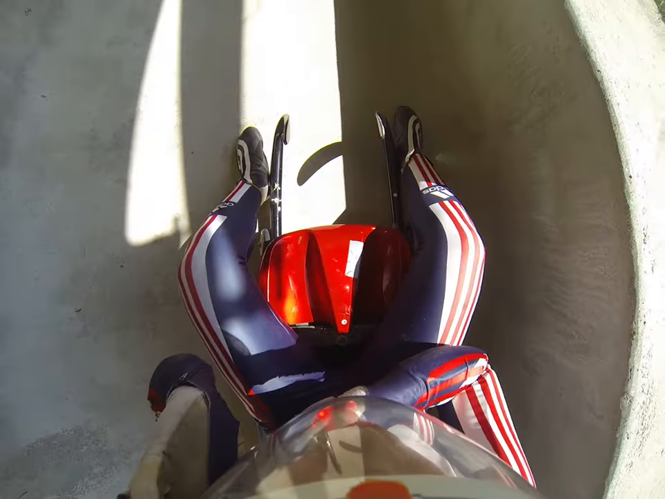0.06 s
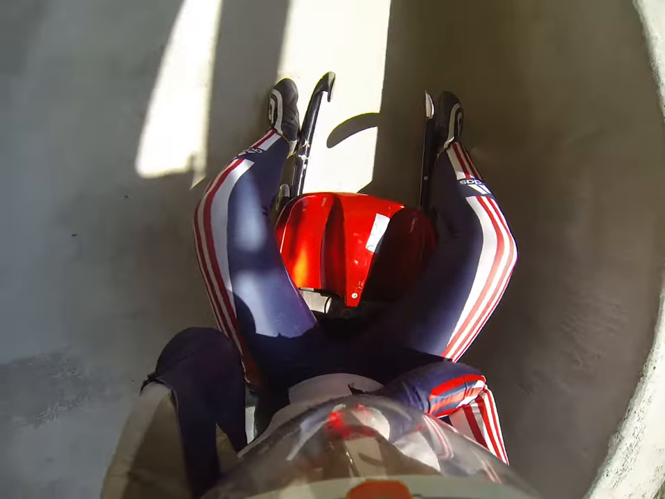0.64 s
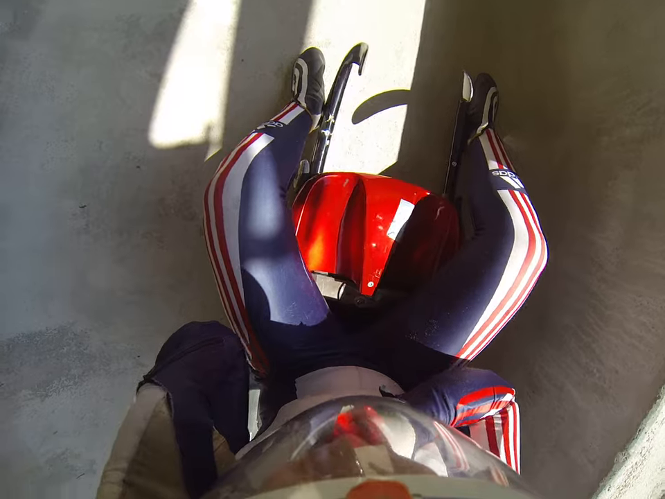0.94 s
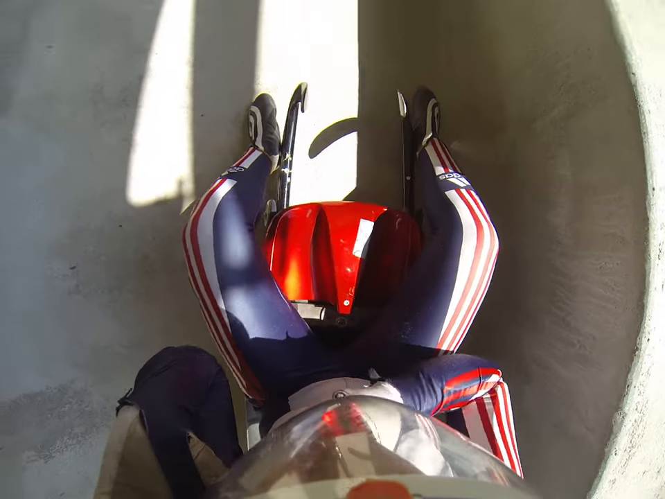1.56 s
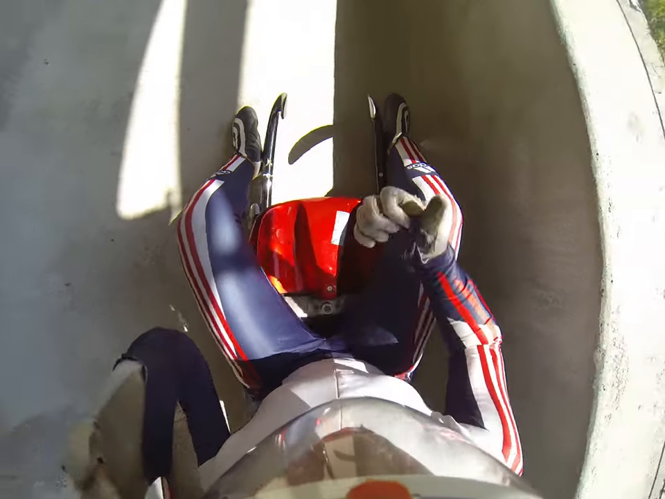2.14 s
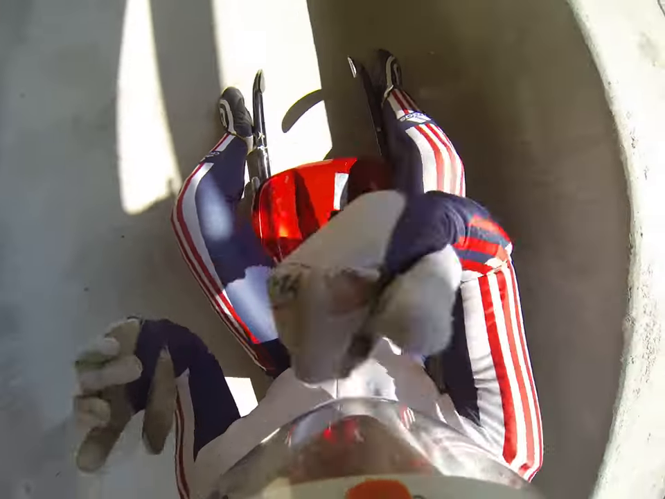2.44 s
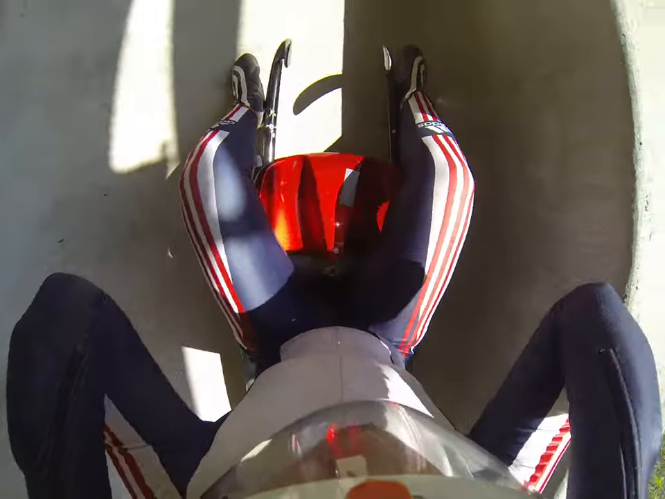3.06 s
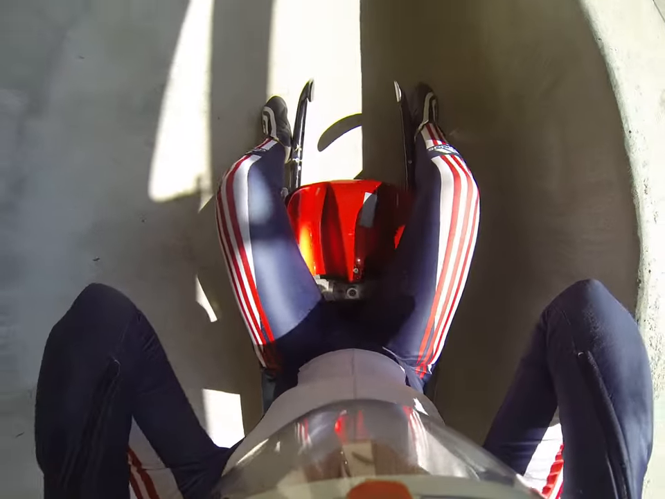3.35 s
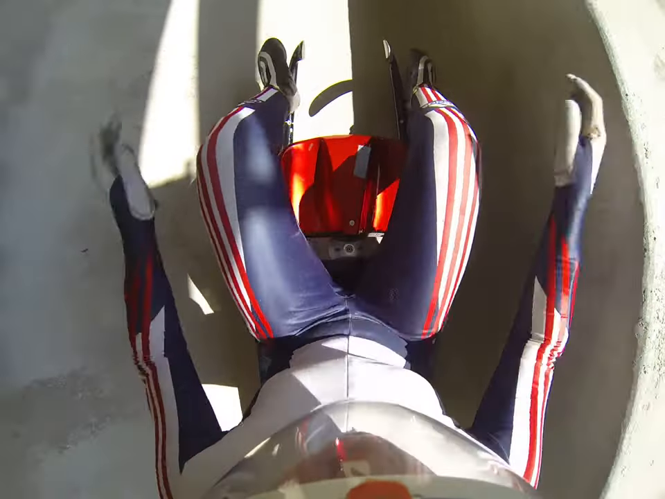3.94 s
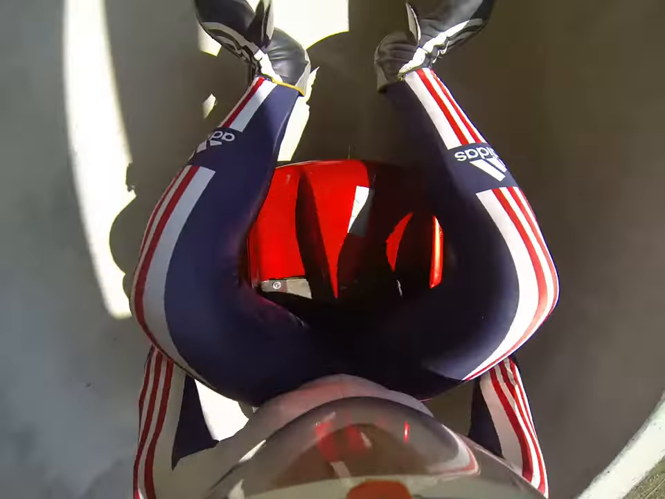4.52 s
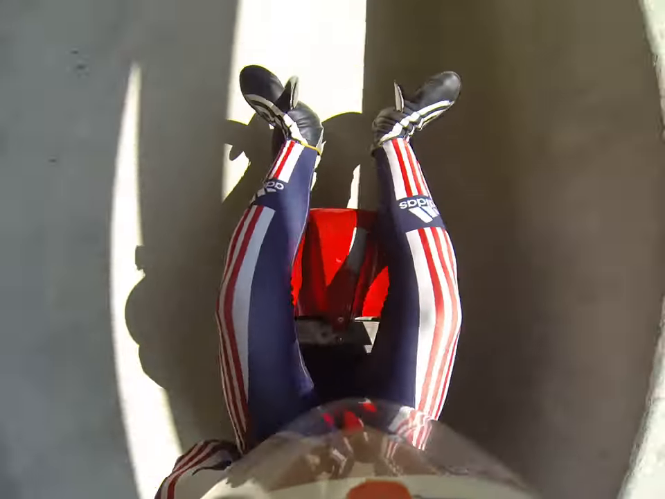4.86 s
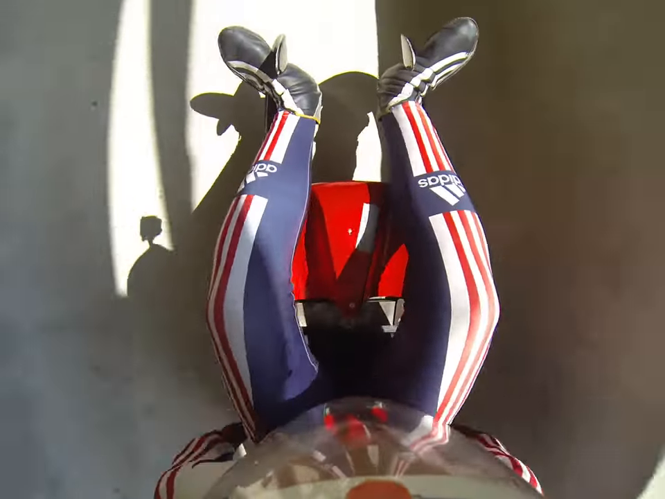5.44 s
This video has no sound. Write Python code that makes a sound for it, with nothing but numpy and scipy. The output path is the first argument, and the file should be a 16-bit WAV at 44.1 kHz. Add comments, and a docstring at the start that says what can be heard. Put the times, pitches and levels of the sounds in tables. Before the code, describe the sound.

A single sharp hand clap, close enough to overload the helmet microphone, stands out about halfway through a luge start in a concrete chute. Low gusts of wind come and go throughout, over quiet runner scraping, cloth rubbing and boxy knocks. Heavy, dull thumps land shortly before and after the clap. Toward the end come small squeaks and ticks as the rider lies back and the wind picks up.

```python
"""A concrete start chute, heard close up from a microphone in a closed camera housing on a luge rider's helmet.
The sled rocks to and fro: runners rumble and scrape and the suit rubs, among knocks, rattles and ticks.
Wind buffets the housing and blows its hollow like a bottle, over a faint hiss and whine.
The rider claps once, hard enough to overload the microphone and duck its gain,
then pushes off and lies back, shoes and suit squeaking on the sled."""
import sys
import numpy as np
from scipy import signal
from scipy.fft import rfft, irfft, next_fast_len
from scipy.io import wavfile
from scipy.ndimage import uniform_filter1d, minimum_filter1d, map_coordinates

SR = 44100
rng = np.random.default_rng(int(sys.argv[2]) if len(sys.argv) > 2 else 0)


def pcm_store(signal):
    """Save signal as 16-bit PCM."""
    levels = np.round(np.clip(np.atleast_2d(signal), -1, 1) * 32767)
    wavfile.write(sys.argv[1], SR, levels.astype(np.int16).T)


N = 250929
TIME = np.arange(N) / SR
AGE = np.arange(SR // 3) / SR  # seconds since a short sound began

# jolts of the helmet, each with a puff of air: t/s, sway/dB, relative puff/dB
JOLTS = [(0.126, -13, -37), (1.35, -37, -17), (1.997, -4, -12.5), (2.47, -3, -26), (3.139, 1.5, -10.5),
         (5.188, -25, -9), (5.352, -15, -5)]
# the sled's rumble as it rocks, then sets off: t/s, level/dB
RUMBLE_LEVEL = [(0, -56), (.4, -52.5), (.78, -53.5), (1.12, -62.5), (1.5, -55), (1.8, -57), (2.35, -62.5),
                (2.95, -62), (3.28, -58), (3.6, -59.5), (4.15, -60.5), (4.47, -52), (4.65, -55),
                (5.69, -53)]
# resonances of the air inside the housing: f/Hz, width/Hz, gain/dB
HOLLOW_MODES = [(262, 150, -6.5), (387, 114.4, 1), (491.4, 142, -4.5), (737, 317, -15)]
# resonances of the housing's stiff shell: f/Hz, width/Hz, gain/dB
SHELL_MODES = [(1242, 330, 4), (1610, 376, 4), (2561, 150, -6.5), (2921, 670, -15.5), (3802, 1500, -26.5),
               (5800, 760, -23)]
# bright spectrum of rubbing cloth, also used for the hiss: f/Hz, gain/dB
CLOTH_SPECTRUM = [(900, -40), (2000, -3), (3200, 0.5), (4300, -3), (5600, -4), (6500, -7), (7700, -5.5),
                  (9000, -6), (12500, -4), (15500, -19)]
# spectrum of a low, heavy thud: f/Hz, gain/dB
THUD_SPECTRUM = [(30, -22), (70, -3), (120, 4), (220, -10.5), (330, -15), (900, -61.5), (3000, -110)]
# treble lost by a padded contact: f/Hz, gain/dB
PADDING = [(1800, -1.5), (2700, -3.5), (3500, -5.5), (6000, -11), (14000, -27.5)]


def amp(db):
    """Decibels to gain."""
    return 10 ** (np.asarray(db) / 20)


def unit(x):
    """Scale to rms 1."""
    return x / np.sqrt(np.mean(x ** 2) + 1e-20)


def crest(x):
    """Scale so that the loudest 5 ms have rms 1."""
    return x / np.sqrt(uniform_filter1d(x ** 2, size=220).max() + 1e-20)


def curve(points):
    """Join (t/s, value) points into one value per sample."""
    return np.interp(TIME, *np.transpose(points))


def wobble(rate):
    """A smooth random curve, rate knots a second."""
    return map_coordinates(rng.standard_normal(int(N * rate / SR) + 4), [TIME * rate])


def decay(t60):
    """An envelope that falls 60 dB in t60 seconds."""
    return np.exp(-np.log(1000) * AGE / t60)


def pulse(peak_s):
    """An envelope that rises to 1 at peak_s and dies away."""
    return AGE / peak_s * np.exp(1 - AGE / peak_s)


def swell(t, width_s):
    """A bell-shaped rise and fall around time t."""
    return np.exp(-.5 * ((TIME - t) / width_s) ** 2)


def stroke(t, width_s, bite=.12, release=0.3):
    """Envelope of a rub, three widths long around time t: it bites quickly and lets go more slowly."""
    u = (TIME - t) / width_s
    return (1 + np.tanh((u + 1.5) / (2 * bite))) * (1 - np.tanh((u - 1.5) / (2 * release))) / 4


def add(track, t, sound):
    """Mix a sound into the track at time t."""
    part = track[round(t * SR):][:len(sound)]
    part += sound[:len(part)]


def colour(x, points):
    """Minimum-phase filter through (f/Hz, gain/dB) points."""
    size = 2 * next_fast_len(len(x) // 2 + 8192)
    hz, db = np.transpose(points)
    log_f = np.log(np.fft.rfftfreq(size, 1 / SR) + 1)
    cepstrum = irfft(np.log(amp(np.interp(log_f, np.log(hz), db))))
    cepstrum[1:size // 2] *= 2
    cepstrum[size // 2 + 1:] = 0
    return irfft(rfft(x, size) * np.exp(rfft(cepstrum)))[:len(x)]


def resonate(x, modes):
    """Drive (f/Hz, width/Hz, gain/dB) resonances of alternating polarity with x."""
    size = 2 * next_fast_len(len(x) // 2 + 8192)
    f = np.fft.rfftfreq(size, 1 / SR)
    response = sum((-1) ** k * amp(db) * 1j * f * width / (hz * hz - f * f + 1j * f * width)
                   for k, (hz, width, db) in enumerate(modes))
    return irfft(rfft(x, size) * response)[:len(x)]


def narrow_noise(hz, width_hz):
    """Noise of rms 1 ringing in one steep resonance."""
    mode = [(hz, width_hz, 0)]
    return unit(resonate(resonate(rng.standard_normal(N), mode), mode))


def grit(spread_db, rate):
    """Friction: noise whose strength jumps with each tiny slip, rate slips a second."""
    slip = (np.arange(N) * rate / SR).astype(int)
    return unit(rng.standard_normal(N) * amp(spread_db * rng.standard_normal(N)[slip]))


def contact(t60, chatter):
    """Force of a contact: one push, then dying chatter."""
    force = rng.standard_normal(len(AGE)) * decay(t60)
    force *= chatter / np.linalg.norm(force)
    force[0] += 1
    return force


def buffeting(spectrum):
    """Slow pressure swings of even strength."""
    eddies = unit(colour(rng.standard_normal(N), spectrum))
    power = uniform_filter1d(np.abs(signal.hilbert(eddies)) ** 2, size=3000) / 2
    return eddies / (np.sqrt(np.abs(power)) + 0.15)


def hiss(level_db=-70.5):
    """A fine steady hiss under everything."""
    return amp(level_db) * unit(colour(grit(spread_db=3, rate=5600), CLOTH_SPECTRUM))


def whine(level_db=-85, flutter_db=3):
    """A faint, thin whine that flutters in the hiss."""
    return amp(level_db + flutter_db * wobble(40)) * narrow_noise(hz=5580, width_hz=160)


def drone(offset_db=-10.5, launch_s=4.21, rise_db_per_s=9, waver_db=2, wander_hz=16):
    """Passing air blows the housing like a bottle, unsteady in pitch and louder as the sled sets off."""
    level = curve(RUMBLE_LEVEL) + offset_db + rise_db_per_s * np.maximum(TIME - launch_s, 0)
    drift = np.exp(2j * np.pi * np.cumsum(wander_hz * wobble(9)) / SR)
    envelope = amp(level + waver_db * wobble(15))
    return envelope * np.real(signal.hilbert(narrow_noise(hz=410, width_hz=63)) * drift)


def wind(shake_db=-2, heave_db=-1, puff_shake_db=-7, puff_heave_db=2):
    """Wind right on the housing: quick shaking rides on deep heaves; a jolt's puff is mostly heave."""
    # air moving past the helmet: t/s, relative level/dB
    air_level = [(0, -34.5), (.38, -32), (.52, -18), (.84, -21.5), (.98, -27.5), (1.25, -26), (1.55, -20),
                 (1.88, -22.5), (2.22, -32), (2.76, -32), (3.02, -30), (3.28, -24.5), (3.9, -29.5),
                 (4.67, -17), (5, -25.5), (5.22, -25), (5.69, -19.5)]
    # the quick shaking: f/Hz, gain/dB
    shake_spectrum = [(22, -27.5), (34, -4.5), (45, -0.5), (53, -6.5), (62, -14.5), (85, -20.5), (130, -33),
                      (200, -51.5), (400, -64), (1000, -120)]
    # the slow heaves: f/Hz, gain/dB
    heave_spectrum = [(6, -27), (16, -4), (27, 2), (33, -4.5), (42, -29), (70, -59.5), (200, -110)]
    # only the slow part of a gust gets through to the microphone: f/Hz, gain/dB
    gust_band = [(50, 0.5), (65, -5), (90, -7.5), (140, -27), (300, -54)]
    air = amp(curve(air_level))
    puffs = sum(amp(db) * swell(t, width_s=0.033) for t, _, db in JOLTS)
    shake = (air + amp(puff_shake_db) * puffs) * amp(shake_db + 3 * wobble(18))
    shake *= buffeting(shake_spectrum)
    heave = (air + amp(puff_heave_db) * puffs) * amp(heave_db + 2 * wobble(35))
    heave *= buffeting(heave_spectrum)
    return colour(shake + heave, gust_band)


def sway(hz=45, t60=0.28, rise_s=0.0026):
    """Each jolt sets the helmet and its mount rocking at a very low pitch."""
    out = np.zeros(N)
    swing = np.sin(2 * np.pi * hz * AGE) * decay(t60) * (1 - np.exp(-AGE / rise_s))
    for t, db, _ in JOLTS:
        add(out, t, amp(db) * swing)
    return out


def runners(scrape_db=-9, scrape_growth=.36):
    """Runners on rough concrete below the rider: rumble and scrape share the same bumps."""
    # the hollow rumble: f/Hz, gain/dB
    rumble_spectrum = [(40, -23.5), (110, 7.5), (220, -1.5), (310, -1.5), (395, -3.5), (500, -8.5),
                       (700, -9.5), (1000, -18), (2000, -29), (6000, -69)]
    # the gritty scrape: f/Hz, gain/dB
    scrape_spectrum = [(300, -32.5), (1050, -16), (1280, 4.5), (1650, -8), (2000, -8.5), (2400, -10.5),
                       (3100, -20), (4200, -24), (6000, -30.5), (15000, -57)]
    level = curve(RUMBLE_LEVEL)
    scrape_level = level.mean() + scrape_growth * (level - level.mean()) + scrape_db
    bumps = wobble(35)
    rumble = unit(colour(grit(spread_db=1.5, rate=190), rumble_spectrum))
    scrape = unit(colour(grit(spread_db=1.5, rate=1600), scrape_spectrum))
    return rumble * amp(level + 2 * bumps) + scrape * amp(scrape_level + 1.6 * bumps)


def ticks(gain_db=-12, peak_s=0.0025):
    """Faint, sharp ticks and clicks close to the microphone, each a few milliseconds of bright noise."""
    # ticks and clicks: t/s, relative level/dB
    clicks = [(0.7734, -44), (1.5974, -46.5), (2.008, -46), (2.024, -45), (2.0517, -47.5), (2.79, -47),
              (2.9041, -44), (3.2214, -45), (3.6078, -46), (4.0393, -49.5), (4.2782, -49), (5.121, -42),
              (5.268, -42.5), (5.2836, -42.5), (5.3183, -42.5), (5.379, -43), (5.3986, -42.5)]
    # one sharp tick: f/Hz, gain/dB
    tick_spectrum = [(600, -28.5), (2000, 3), (3800, -8), (5300, 2.5), (6400, -2), (7500, 2.5),
                     (9000, -13.5), (12200, 0.5), (15500, -22.5)]
    out = np.zeros(N)
    for t, db in clicks:
        burst = pulse(peak_s) * rng.standard_normal(len(AGE))
        add(out, t, amp(db + gain_db) * crest(colour(burst, tick_spectrum)))
    return out


def squeaks(sag_hz_per_s=2400, jitter_hz=65, flutter_db=3, overtone_db_per_octave=-13):
    """Shoes and suit stick and slip on the sled: short, rough chirps that sag in pitch."""
    # catches as the rider lies back: middle t/s, width/s, level/dB, f/Hz
    catches = [(4.231, 0.009, -50, 1310), (4.268, 0.009, -55, 1430), (4.317, 0.008, -51.5, 1295),
               (4.395, 0.012, -49, 1330), (4.432, 0.011, -54, 1320), (4.544, 0.012, -57.5, 1370),
               (4.789, 0.012, -57.5, 1280), (4.884, 0.012, -53, 1310), (4.914, 0.01, -52.5, 1350)]
    out = np.zeros(N)
    jitter = jitter_hz * wobble(500)
    flutter = unit(amp(flutter_db * wobble(220)))
    for t, width_s, db, hz in catches:
        near = np.abs(TIME - t) < 5 * width_s
        pitch = hz - sag_hz_per_s * (TIME[near] - t) + jitter[near]
        phase = 2 * np.pi * np.cumsum(pitch) / SR
        squeak = sum(amp(overtone_db_per_octave * np.log2(k)) * np.sin(k * phase) for k in range(1, 4))
        out[near] += amp(db) * (swell(t, width_s) * flutter)[near] * unit(squeak)
    return out


def scuffs(stutter_db=2, push_db=3):
    """Brief stuttering rubs within arm's reach sound the housing's shell and hollow and push the sled."""
    # gloves, sleeves and legs rubbing past: middle t/s, width/s, rasp/dB, hollow/dB, hiss/dB
    rubs = [(0.311, 0.017, -52.5, -61, -85), (0.383, 0.027, -54.5, -51.5, -85),
            (0.485, .009, -55, -49, -83), (0.707, 0.022, -57.5, -51.5, -82),
            (0.802, 0.021, -54.5, -52, -80), (1.003, 0.013, -55, -65, -80), (1.057, 0.015, -57.5, -65, -80),
            (1.423, 0.043, -59, -58, -77), (1.511, 0.014, -51.5, -55, -74), (1.63, 0.035, -60, -63, -77),
            (1.983, 0.013, -41.5, -34, -80), (2.0, .034, -60, -39, -88), (2.012, .013, -35, -31, -73),
            (3.106, 0.0074, -45.5, -50, -64), (3.69, 0.034, -51.5, -55, -69),
            (3.714, 0.026, -51.5, -60.5, -59.5), (4.237, 0.0094, -60, -51.5, -57.5),
            (4.299, 0.019, -59, -68, -66), (4.393, 0.018, -55.5, -54, -63), (4.467, 0.021, -54, -47, -65),
            (4.54, 0.016, -56.5, -60, -68.5), (4.803, 0.02, -63.5, -56, -72),
            (4.892, 0.033, -54, -55.5, -60), (5.554, 0.016, -64, -56, -64)]
    rasp_tone = [(950, -6), (1250, -0.5), (1550, -5), (2000, 1.5), (2600, -0.5), (3500, -1.5),
                 (5400, -5), (6400, -15), (14000, -39.5)]  # f/Hz, gain/dB
    out = np.zeros(N)
    stutter = unit(amp(stutter_db * wobble(130)))
    shell = resonate(grit(spread_db=3, rate=740), SHELL_MODES)
    rasp = stutter * unit(colour(shell, rasp_tone))
    cavity = resonate(grit(spread_db=3.5, rate=710), HOLLOW_MODES)
    hollow = unit(colour(cavity, [(1200, 0), (4000, -20)]))
    push = amp(push_db) * unit(colour(rng.standard_normal(N), THUD_SPECTRUM))
    cloth = colour(grit(spread_db=2.5, rate=1800), CLOTH_SPECTRUM)
    weave = stutter * unit(colour(cloth, [(7500, 6.5), (10000, -7.5)]))
    for t, width_s, rasp_db, hollow_db, hiss_db in rubs:
        rub = amp(rasp_db) * rasp + amp(hollow_db) * (hollow + push) + amp(hiss_db) * weave
        out += stroke(t, width_s) * rub
    return out


def knocks(crack_gain_db=-7, low_gain_db=1, lag_s=0.0022):
    """Knocks and rattles ring the housing's shell and hollow over a thud; harder ones are brighter."""
    # knocks and short rattles, including one just after the clap; levels are relative:
    # t/s, crack/dB, hollow/dB, thud/dB, rattle t60/s, treble/dB
    contacts = [(0.13, -32, -26.5, -24.5, 0.037, -3), (0.222, -32, -31, -41, .05, -11),
                (0.5055, -34, -25.5, -28, 0.05, -12), (0.5138, -27.5, -38, -43, 0.055, 13),
                (0.845, -26, -41, -49, 0.017, -3), (1.62, -48, -64, -33.5, 0.23, -3),
                (1.861, -45.5, -39, -43, 0.036, -12), (1.926, -49, -45.5, -32.5, 0.052, -4),
                (2.001, -34, -29, -20.5, 0.085, -1), (2.4756, -32, -32.5, -31, 0.088, 14),
                (2.603, -51, -48, -54, .1, 8), (2.852, -66, -57, -42, 0.17, 0),
                (2.975, -61, -48, -35, 0.087, 0), (3.1, -50, -52, -19, 0.085, 2),
                (3.1233, -24, -22, -25, 0.053, 1), (3.1472, -25.5, -36, -22.5, 0.025, -26),
                (3.18, -46, -47, -40, .16, 2), (3.2846, -43, -38.5, -38, 0.11, 2),
                (3.6367, -45, -45, -45, 0.03, 7), (3.687, -30.5, -39, -44, 0.023, 5),
                (4.166, -60, -62, -32, 0.085, -8), (4.224, -46, -56, -51, .07, 16),
                (4.787, -52, -47, -39.5, .06, 0), (4.96, -41.5, -44, -48, 0.04, 6),
                (5.1139, -42.5, -54, -60.5, .045, 1), (5.359, -37, -47, -35.5, 0.068, -3),
                (5.3727, -38, -31.5, -27, 0.057, 0)]
    out = np.zeros(N)
    for t, crack_db, hollow_db, thud_db, t60, treble_db in contacts:
        shell = colour(resonate(contact(t60, chatter=1.3), SHELL_MODES), PADDING)
        shell = colour(shell, [(1600, 0), (3000, treble_db / 2), (4800, treble_db),
                               (6500, treble_db), (9000, -8)])
        hollow = resonate(contact(t60, chatter=1.0), HOLLOW_MODES)
        hollow = colour(hollow, [(450, -2.5), (700, -2.5 + .45 * treble_db), (1100, -3.5), (3000, -35)])
        thud = colour(contact(t60, chatter=0.4), THUD_SPECTRUM)
        add(out, t, amp(crack_db + crack_gain_db) * crest(shell))
        # the heavy parts take a moment to get moving
        add(out, t + lag_s, amp(hollow_db + low_gain_db) * crest(hollow))
        add(out, t + lag_s, amp(thud_db + low_gain_db) * crest(thud))
    return out


def clap(t=2.4518, ring_hz=1335, ring_db=10, slap_db=-4, body_lag_s=.002, echo_db=-41):
    """At arm's length the palms squeeze out air that rings the shell; the chute answers faintly."""
    # what the palms set ringing: f/Hz, level/dB, t60/s
    body_modes = [(126, -16, .045), (194.1, 2.5, 0.018), (266, 3, 0.024), (379, 5, 0.021),
                  (725.4, 8, 0.014), (960, 1, 0.0098), (1346, -3, .021), (1688, -5, .021),
                  (2040, -9, 0.017), (2466, -13, .018), (3119, -8, 0.012), (4910, 0, 0.0085),
                  (5670, -3, .009), (7300, -20, .011), (2080, -50, 0.33)]
    out = np.zeros(N)
    squeeze = pulse(peak_s=0.00235) ** 4
    ring = amp(ring_db) * squeeze * np.sin(2 * np.pi * ring_hz * AGE)
    slap = amp(slap_db) * crest(resonate(squeeze * rng.standard_normal(len(AGE)), SHELL_MODES))
    body = sum(amp(db) * np.sin(2 * np.pi * hz * AGE) * decay(t60) for hz, db, t60 in body_modes)
    reflections = resonate(contact(t60=0.14, chatter=8), SHELL_MODES)
    echo = amp(echo_db) * crest(colour(reflections, PADDING))
    add(out, t, ring + slap + echo)
    add(out, t + body_lag_s, body)
    return out


def scene():
    """Everything reaches one microphone inside the housing."""
    background = wind() + drone() + runners() + hiss() + whine()
    return (background + sway() + knocks() + scuffs() + squeaks() + ticks() + clap())[None]


def gain_control(x, threshold_db=1.1, cut_per_db=1.204, attack_s=.03, hold_s=0.32, recover_db_per_s=20.5):
    """An overload turns the recorder's gain down; it holds, then creeps back."""
    level_db = 10 * np.log10(np.abs(uniform_filter1d(x ** 2, size=130)) + 1e-12)
    wanted_cut = cut_per_db * np.maximum(level_db - threshold_db, 0)
    half_hold = int(hold_s * SR / 2)
    held_cut = -minimum_filter1d(-wanted_cut, 2 * half_hold + 1, origin=half_hold, mode="constant")
    recovery = recover_db_per_s * TIME
    cut_db = np.maximum.accumulate(held_cut + recovery) - recovery
    step = 1 / (attack_s * SR)
    return x * amp(-signal.lfilter([step], [1, step - 1], cut_db))


def record(dry, gain_db=0.47, ceiling=.97, top_hz=15900):
    """The recorder rides its gain, clips softly near full scale, dulls the treble and cuts off the top."""
    # the microphone's top end: f/Hz, gain/dB
    mic_response = [(4000, 0.5), (6000, -1), (8500, -4), (10500, -4), (13000, -7.5), (15000, -14)]
    driven = amp(gain_db) * gain_control(dry[0])
    clipped = driven / (1 + np.abs(driven / ceiling) ** 6) ** (1 / 6)
    band_limit = signal.butter(20, top_hz, fs=SR, output="sos")
    return signal.sosfiltfilt(band_limit, colour(clipped, mic_response))[None]


dry = scene()
out = record(dry)
pcm_store(out)
```